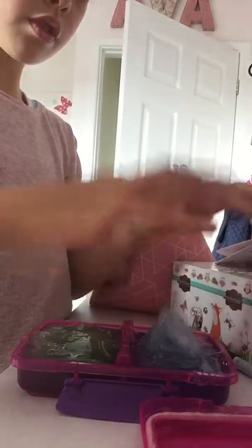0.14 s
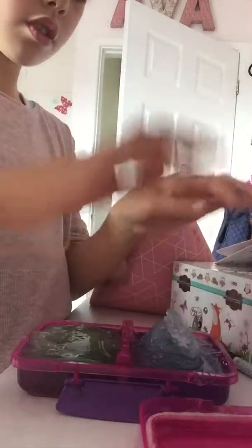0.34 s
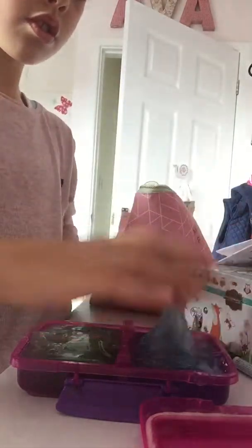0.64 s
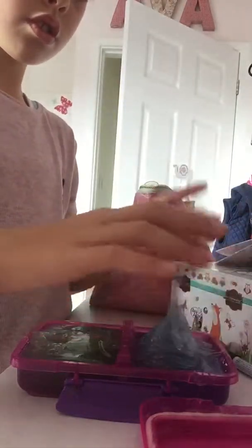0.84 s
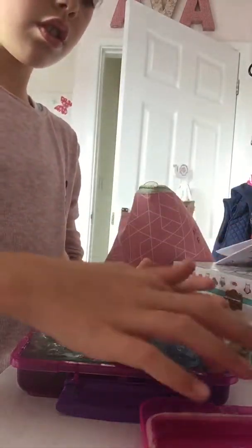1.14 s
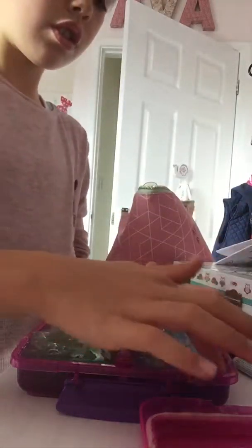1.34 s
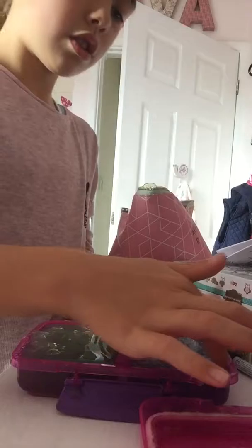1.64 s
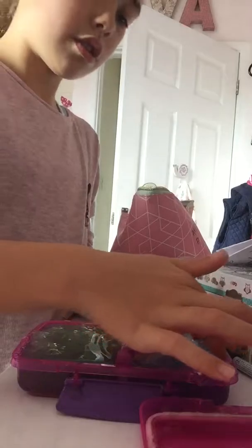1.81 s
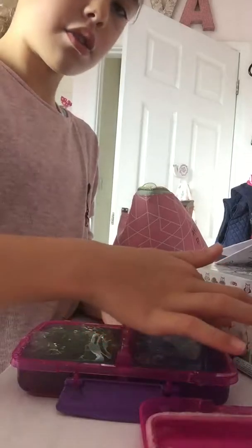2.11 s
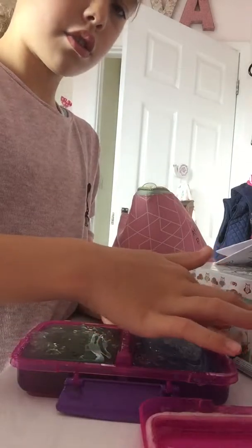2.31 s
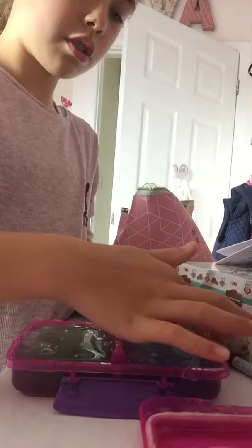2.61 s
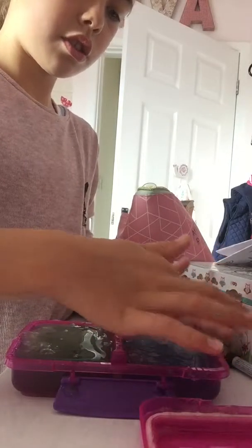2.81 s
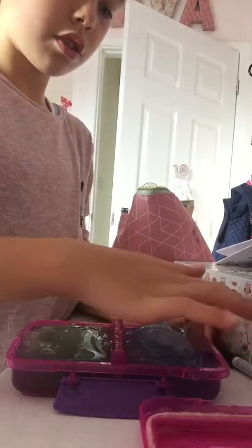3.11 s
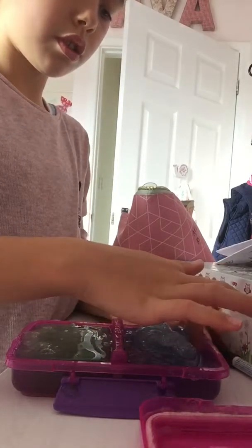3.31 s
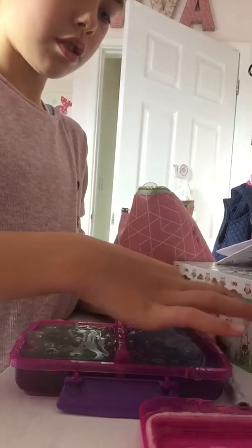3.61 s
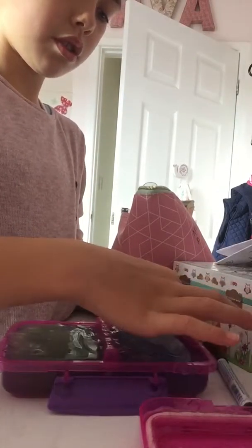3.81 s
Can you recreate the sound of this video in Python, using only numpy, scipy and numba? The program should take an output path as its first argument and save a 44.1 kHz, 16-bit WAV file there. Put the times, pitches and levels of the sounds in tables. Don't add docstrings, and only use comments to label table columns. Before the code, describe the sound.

Slime in a plastic box is softly pressed and peeled, then the box scrapes, knocks and snaps.

```python
import sys
import numpy as np
from scipy import signal
from scipy.fft import rfft, irfft
from scipy.io import wavfile
from scipy.ndimage import uniform_filter1d
from numba import njit

SR = 44100
rng = np.random.default_rng(int(sys.argv[2]) if len(sys.argv) > 2 else 0)


def log_audio(samples):
    frames = np.atleast_2d(samples).T
    limited = np.clip(frames, -1, 1)
    pcm = np.round(limited * 32767).astype(np.int16)
    wavfile.write(sys.argv[1], SR, pcm)


def decibels_to_gain(level_db):
    exponent = np.asarray(level_db, float) / 20
    return 10 ** exponent


N = 174195

# (frequency [Hz], density [dB per Hz])
HISS_SPECTRUM = [(45, 9), (98, -5.5), (179, -7), (364, -14), (666, -8), (1040, -12), (6720, -21),
                 (16000, -29.5)]
# (time [s], level [dB])
RESTLESS_ARMS = [(0, -18), (.38, -8), (.45, -2), (.7, -2.5), (.95, -6), (1.1, 3), (1.9, -3), (2, -7),
                 (2.35, 0.5), (2.75, -5), (2.95, 1.5), (3.2, -3.5), (3.35, -1.5), (3.95, 11)]
# (time [s], peak [dB], frequency [Hz], decay [cycles])
TABLE_THUMPS = [(0.202, -46.5, 61, 1.4), (0.419, -61, 136, 15), (0.584, -43.5, 107, 1.55),
                (1.179, -55, 258, 5.4), (0.747, -58, 134, 6.5), (0.784, -40.5, 64.4, 2.05),
                (1.081, -55.5, 150, 7.1), (1.198, -46, 69.5, 0.67), (1.421, -41, 144, 2.1),
                (1.576, -51.5, 94, 4.3), (1.771, -51.5, 140, 4.5), (1.839, -57, 148, 4.7),
                (1.896, -50, 183, 2.3), (1.919, -46, 70, 0.83), (1.991, -57, 140, 1.9),
                (2.386, -39.5, 109, 2.1), (2.43, -42, 99, 2.3), (2.509, -44, 101, 2.6),
                (2.63, -52, 129.4, 6.1), (3.084, -37.5, 118, 2.05), (3.147, -58.5, 288, 2.9),
                (3.368, -47, 128, 1.8), (3.399, -49.5, 194.4, 7.1), (3.429, -49.5, 129, 4.5),
                (3.589, -37, 243, 12.3), (3.802, -29.5, 86, 3.5), (3.891, -41, 114, 3.5),
                (3.926, -37.5, 230, 2.2), (0.439, -63, 263, 7.7), (.65, -60, 107, 4.1),
                (0.949, -61, 50.4, 1.6), (1.299, -56, 256, 7.4), (1.34, -53.5, 157, 6.3),
                (1.431, -52.5, 228, 5.4), (1.429, -52, 55.4, 1.5), (1.665, -53.5, 157.5, 7.1),
                (2.14, -64, 162, 6.4), (2.44, -63, 276, 6), (3.385, -53.5, 287, 11.4), (3.38, -54, 60, 1.4),
                (3.61, -46.5, 372, 7.4), (3.638, -48.5, 140, 6.7), (.835, -56.5, 128, 3.5),
                (3.5, -48.5, 285, 16), (1.97, -63.5, 281, 6), (2.455, -49, 91, 3), (.49, -63.5, 242, 6.4),
                (2.4, -54, 160, 4)]
# (time [s], peak [dB], ring [Hz])
BOX_KNOCKS = [(.189, -44.5, 695), (.196, -52.5, 439), (.532, -57, 647), (.946, -54.5, 630),
              (1.185, -42.5, 597), (1.413, -38.5, 725), (2.28, -51, 730), (3.1, -50.5, 760),
              (3.24, -58, 850), (3.154, -51, 635), (3.362, -47, 627), (3.484, -24.5, 660),
              (3.605, -23, 657), (3.638, -24.5, 708), (3.722, -41, 747), (3.906, -41, 610),
              (1.27, -42, 810), (3.558, -41, 820), (3.545, -31, 880), (3.617, -42, 730), (3.628, -33, 680),
              (3.749, -57, 695), (3.793, -22.5, 700), (3.824, -38, 760), (3.835, -25, 700),
              (3.922, -34.5, 466), (3.939, -34, 647)]
# (time [s], peak [dB], ring [Hz])
WALL_TAPS = [(.196, -46, 3060), (0.629, -54, 1590), (1.1301, -42, 2466), (1.188, -35.5, 1934),
             (2.4917, -44.5, 1680), (3.2136, -55.5, 1550), (3.367, -50, 3300), (3.373, -40.5, 2360),
             (3.6045, -31, 1360), (3.6243, -26, 1546), (3.6716, -44, 2150), (3.62, -40, 2230),
             (3.674, -50, 1670), (3.826, -40, 2080), (3.9215, -54, 1620), (.77, -58, 1500),
             (.744, -58, 1510)]
# (frequency [Hz], level [dB], t60 [s])
LID_MODES = [(692, 6.5, 0.034), (1436, 15.5, 0.024), (1567, 16.5, 0.01), (2140, 8, 0.017),
             (2360, 4.5, 0.018), (3300, -3, 0.0064), (2930, -24, 0.017)]
# (time [s], pressure [dB], speed [dB])
LONG_SLIDES = [
    [(1.06, -75, -1), (1.15, -74, 5), (1.18, -67, -5), (1.195, -61, -1), (1.3, -56.5, -8.5),
     (1.45, -54.5, -2.5), (1.6, -59.5, 1), (1.72, -56, -10), (1.82, -59, -15), (1.86, -75, -20)],
    [(2.37, -67.5, -31), (2.42, -48, -19), (2.485, -47, -20), (2.51, -56, -36), (2.6, -57, -16),
     (2.66, -61, -18), (2.7, -83, -20)],
    [(2.86, -70.5, -26), (2.9, -64, -11), (2.94, -62.5, -0.5), (2.97, -65, -8), (3.03, -73, -8)],
]
# (time [s], pressure [dB], speed [dB])
JERKY_SHOVES = [
    [(3.345, -99.5, 18), (3.372, -63, -1), (3.4, -73, -11), (3.44, -62.5, -4), (3.475, -56.5, -7.5),
     (3.51, -52, -25), (3.535, -40, -1)],
    [(3.536, -42, 6), (3.56, -40, -9.5), (3.595, -45, -7.5), (3.61, -40.5, -8), (3.64, -40, -14),
     (3.65, -49.5, -11), (3.685, -58, -13), (3.7, -60, -5)],
    [(3.7, -58.5, -6), (3.728, -49, -22), (3.742, -50.5, -16), (3.76, -38.5, -16), (3.8, -36.5, -15.5),
     (3.84, -36.5, -11.5), (3.875, -45, -21), (3.895, -63, -13), (3.95, -56.5, -32)],
]
# (hollow [Hz], belly [dB], table [dB], table [Hz], base [dB])
BOX_GRIPS = [(809, -14, -6.5, 155, -19), (750, -6.5, -2, 94, -19), (850, -18, -0.5, 130, -10),
             (708, -6.5, -4.5, 120, -13), (670, -4, -6.5, 95, -9), (711, -8, -5.5, 86, -17)]
# (ratio to its main note, width [Hz], level [dB])
HOLLOW_MODES = [(.85, 90, 3.5), (1.01, 89.5, 5), (1.15, 110, -15)]
# (frequency [Hz], width [Hz], level [dB])
WALL_MODES = [(1726, 127, 9), (2061, 117, 8.5), (2362, 79, 6.5), (2860, 190, -5), (3330, 260, -5.5)]
# (start [s], length [s], level [dB])
FINGER_PEELS = [
    (0.126, 0.099, -70),
    (0.61, 0.044, -61),
    (0.735, 0.083, -68),
    (3.418, 0.15, -70.5),
]
# (time [s], peak [dB], ring [Hz], edge
# [dB])
SHARP_TICKS = [(0.11, -42, 9100, 10), (0.1796, -49, 6100, 10), (0.189, -47, 10500, 4),
               (.1965, -47, 10250, -3), (0.629, -31, 6700, 2.5), (.7694, -56, 8000, 14),
               (0.7744, -51, 11000, 6), (3.2147, -47.5, 12600, 16), (3.37, -55, 6400, -14),
               (3.484, -52, 5900, -17), (3.5277, -41, 8400, 10), (3.5324, -33.5, 6030, 5),
               (3.5334, -35.5, 8160, 3), (3.541, -49, 5760, -5), (3.62, -58, 6560, 9),
               (1.135, -60, 14500, -10), (3.265, -59, 6760, 1), (3.605, -54, 9050, 9),
               (.535, -60, 5000, -11)]
# (frequency [Hz], width [Hz], gain share)
MIC_PORT = [(6400, 930, 0.44), (4800, 400, -0.3), (10500, 290, -0.65)]

HISS_DB = -65
SWAY_DB, SWAY_HZ, SWAY_WIDTH_HZ, SWAY_SWING_DB = -69, 140, 144, 3
CREEP_DB, CREEP_HZ, CREEP_WIDTH_HZ, CREEP_SWING_DB = -81, 700, 220, 2.5
RING_CYCLES, RING_S = 28.3, 0.022
TAP_FROM_HZ, TAP_RATTLE, KNOCK_RATTLE = 1200, 1.3, 0.66
SNAP_S, SNAP_DB, BOUNCE_S, BOUNCE_DB = 3.5327, -16, 0.0024, -1.5
SPRAY_DB, SPRAY_T60_S, SPRAY_HZ = -44.5, 0.057, 8000
GRIT_PER_S, GRIT_DB = 1500, 2.5
STUTTER_DB, WALL_STUTTER_DB = 3.0, 2
HOLLOW_WANDER, WANDER_PER_S = 0.023, 13
BELLY_HZ, BELLY_WIDTH_HZ, BASE_HZ = 404, 96, 1302
SHEEN_HZ, SHEEN_DB = 6060, -25
PEEL_HZ, PEEL_WIDTH_HZ = 11000, 14000
TICK_T60_S, TICK_TAIL_DB, TICK_TAIL_S = 0.0076, -27.5, 0.11
ROOM_DB, ROOM_T60_S = -14.5, 0.051
LOW_CUT_HZ, TOP_HZ = 44, 15750


def level(x, db):
    return x * decibels_to_gain(db) / np.sqrt(np.mean(x ** 2))


def band(x, hz, width_hz):
    return signal.lfilter(*signal.iirpeak(hz, hz / width_hz, fs=SR), x)


@njit
def svf(x, hz, width_hz):
    y, b, l = np.empty(len(x)), 0., 0.
    for i in range(len(x)):
        g, k = np.tan(np.pi * hz[i] / SR), width_hz / hz[i]
        v = (b + g * (x[i] - l)) / (1 + g * (g + k))
        b, l, y[i] = 2 * v - b, l + 2 * g * v, k * v
    return y


def walk(rate_hz):
    hold = int(SR / rate_hz)
    steps = np.repeat(rng.standard_normal(N // hold + 1), hold)
    return 0.79 * uniform_filter1d(uniform_filter1d(steps, hold), hold)[:N]


def add(out, start_s, x):
    i = int(start_s * SR)
    out[i:i + len(x)] += x[:N - i]


def fade(t, t60_s):
    return np.exp(-np.log(1000) * t / max(t60_s, 1e-3))


def hiss():
    hz, db = np.array(HISS_SPECTRUM).T
    f = np.maximum(np.fft.rfftfreq(N, 1 / SR), 1)
    shape = decibels_to_gain(np.interp(np.log(f), np.log(hz), db, left=db[0]))
    return level(irfft(rfft(rng.standard_normal(N)) * shape, N), HISS_DB)


def sway():
    centre_hz = SWAY_HZ * decibels_to_gain(2.74 * walk(7.1))
    noise = svf(rng.standard_normal(N), centre_hz, 1. * SWAY_WIDTH_HZ)
    noise = svf(noise, centre_hz, 2. * SWAY_WIDTH_HZ)
    arms_db = np.interp(np.arange(N) / SR, *np.array(RESTLESS_ARMS).T)
    return level(noise, SWAY_DB) * decibels_to_gain(SWAY_SWING_DB * walk(18) + arms_db)


def creep():
    rub = band(rng.standard_normal(N), CREEP_HZ, CREEP_WIDTH_HZ)
    rub = band(rub, CREEP_HZ, 2 * CREEP_WIDTH_HZ)
    return level(rub, CREEP_DB) * decibels_to_gain(CREEP_SWING_DB * walk(9.5))


def thumps():
    out, t = np.zeros(N), np.arange(12000) / SR
    for start_s, db, hz, cycles in TABLE_THUMPS:
        u = t * hz / cycles * 3.27
        add(out, start_s, decibels_to_gain(db) * u * np.exp(1 - u) * np.sin(2 * np.pi * hz * t))
    return out


def knocks():
    out, t = np.zeros(N), np.arange(4000) / SR
    for start_s, db, hz in BOX_KNOCKS + WALL_TAPS:
        rattle = band(rng.standard_normal(4000), hz, hz / 2.3)
        rattle = level(band(band(rattle, hz, hz), hz, hz / 1.17), 0)
        share = TAP_RATTLE if hz > TAP_FROM_HZ else KNOCK_RATTLE
        ring = 1.6 * np.sin(2 * np.pi * hz * t) + share * rattle
        attack = np.sin(np.pi / 2 * np.minimum(t * hz / 2.37, 1)) ** 2
        ring = ring * fade(t, RING_S + RING_CYCLES / hz) * attack
        add(out, start_s, 0.5 * decibels_to_gain(db) * ring / np.abs(ring).max())
    return out


def lid_snap():
    out, t = np.zeros(N), np.arange(4000) / SR
    snap = np.zeros(4000)
    for k, (hz, db, t60_s) in enumerate(LID_MODES):
        snap += decibels_to_gain(db) * np.sin(2 * np.pi * hz * t + k ** 2) * fade(t, t60_s)
    snap = snap * np.minimum(t / 0.00033, 1) / np.abs(snap).max()
    spray = band(band(rng.standard_normal(4000), SPRAY_HZ, 8100), SPRAY_HZ, 11000)
    spray = spray * fade(t, SPRAY_T60_S)
    add(out, SNAP_S, decibels_to_gain(SNAP_DB) * snap + decibels_to_gain(SPRAY_DB) * spray)
    add(out, SNAP_S + BOUNCE_S, decibels_to_gain(SNAP_DB + BOUNCE_DB) * snap)
    return out


def grit():
    hit = rng.random(N) < GRIT_PER_S / SR
    catches = hit * rng.standard_normal(N) * decibels_to_gain(GRIT_DB * rng.exponential(size=N))
    return catches + 0.23 * rng.standard_normal(N)


def wall_rub(rub):
    walls = np.zeros(N)
    for k, (hz, width_hz, db) in enumerate(WALL_MODES):
        walls += (-1) ** k * decibels_to_gain(db) * band(rub, hz, width_hz)
    limits = signal.butter(4, [1500, 3650], "band", fs=SR, output="sos")
    walls = level(signal.sosfilt(limits, walls), 0)
    sheen = level(band(band(rub, SHEEN_HZ, 1200), SHEEN_HZ, 1800), SHEEN_DB)
    return (walls + sheen) * decibels_to_gain(WALL_STUTTER_DB * walk(60))


def slides():
    t, out = np.arange(N) / SR, np.zeros(N)
    rub, shake = grit(), rng.standard_normal(N)
    stutter_db = STUTTER_DB * walk(45)
    walls = wall_rub(rub)
    bends = [1 + HOLLOW_WANDER * walk(WANDER_PER_S) for _ in HOLLOW_MODES]
    for rows, grip in zip(LONG_SLIDES + JERKY_SHOVES, BOX_GRIPS):
        hollow_hz, belly_db, table_db, table_hz, base_db = grip
        s, pressure_db, speed_db = np.array(rows).T
        i, j = int(s[0] * SR), int(s[-1] * SR)
        part, now = rub[i:j], t[i:j]
        hollow = np.zeros(j - i)
        for (ratio, width_hz, db), bend in zip(HOLLOW_MODES, bends):
            hollow += decibels_to_gain(db) * svf(part, hollow_hz * ratio * bend[i:j], 1. * width_hz)
        hollow = level(band(hollow, hollow_hz, 257), 0)
        belly = band(band(part, BELLY_HZ, BELLY_WIDTH_HZ), BELLY_HZ, 2 * BELLY_WIDTH_HZ)
        base = band(band(part, BASE_HZ, 230), BASE_HZ, 590)
        table = band(band(shake[i:j], table_hz, 61.0), table_hz, 225)
        box = hollow + level(belly, belly_db) + level(base, base_db)
        body = decibels_to_gain(stutter_db[i:j]) * box + level(table, table_db)
        pressure = decibels_to_gain(np.interp(now, s, pressure_db))
        pressure = pressure * signal.windows.tukey(j - i, 200 / (j - i))
        speed = decibels_to_gain(np.interp(now, s, speed_db))
        out[i:j] += pressure * (body + speed * walls[i:j])
    return out


def peels():
    out = np.zeros(N)
    centre_hz = np.clip(PEEL_HZ * decibels_to_gain(1.5 * walk(90)), 5000., SR / 3)
    crackle = grit() * decibels_to_gain(3.4 * walk(150))
    fizz = level(svf(crackle, centre_hz, 1. * PEEL_WIDTH_HZ), 0)
    for start_s, length_s, db in FINGER_PEELS:
        i, n = int(start_s * SR), int(length_s * SR)
        out[i:i + n] += decibels_to_gain(db) * np.hanning(n) * fizz[i:i + n]
    return out


def ticks():
    out, t = np.zeros(N), np.arange(4000) / SR
    decay = fade(t, TICK_T60_S) + decibels_to_gain(TICK_TAIL_DB) * fade(t, TICK_TAIL_S)
    for start_s, db, hz, edge_db in SHARP_TICKS:
        burst = rng.standard_normal(4000)
        edge = band(band(burst, 8400, 8800), 13000, 12000) * fade(t, 0.0031) * decibels_to_gain(edge_db)
        ring = 3 * band(band(burst, hz, hz / 5), hz, hz / 3.5) * decay
        tick = edge + ring
        add(out, start_s, decibels_to_gain(db) * tick / np.abs(tick).max())
    return out


def scene():
    near = slides() + ticks() + knocks() + lid_snap() + peels()
    t = np.arange(12000) / SR
    tail = rng.standard_normal(12000) * fade(t, ROOM_T60_S) * (t > 0.003)
    wet = signal.fftconvolve(near, tail / np.sqrt(np.sum(tail ** 2)))[:N]
    background = hiss() + creep() + sway()
    return (near + decibels_to_gain(ROOM_DB) * wet + thumps() + background)[None]


def top_cut(x):
    return signal.sosfilt(signal.butter(12, 16500, fs=SR, output="sos"), x)


def record(dry):
    x = dry + sum(share * band(dry, hz, width_hz) for hz, width_hz, share in MIC_PORT)
    x = signal.sosfilt(signal.butter(6, LOW_CUT_HZ, "high", fs=SR, output="sos"), x)
    x = signal.sosfilt(signal.cheby1(12, 1, TOP_HZ, fs=SR, output="sos"), x)
    return top_cut(x)


dry = scene()
out = record(dry)
log_audio(out)
```